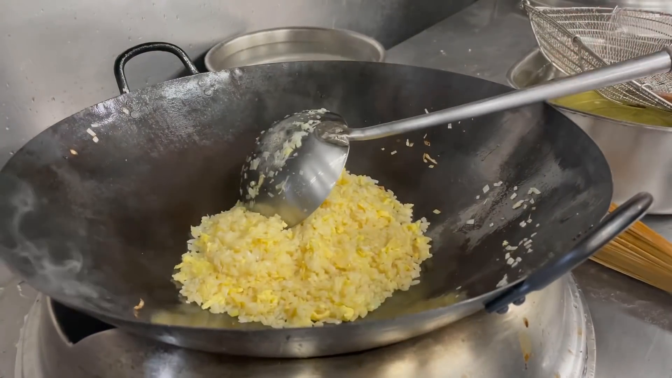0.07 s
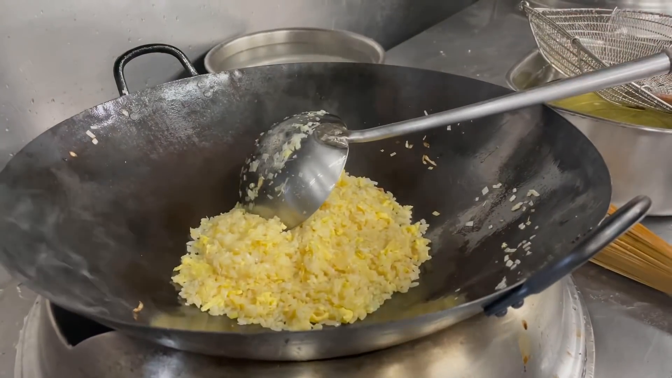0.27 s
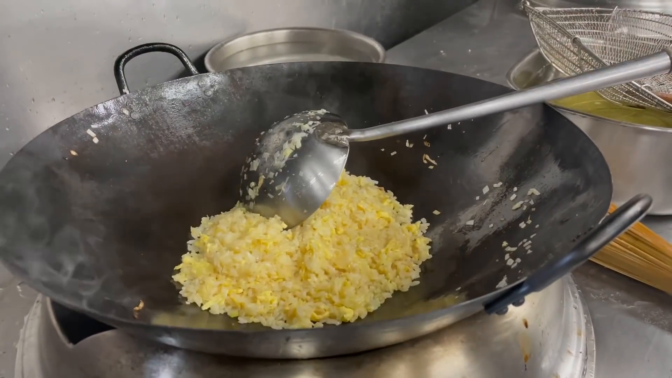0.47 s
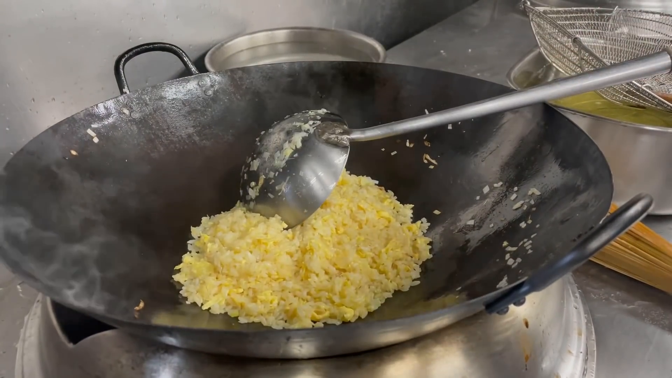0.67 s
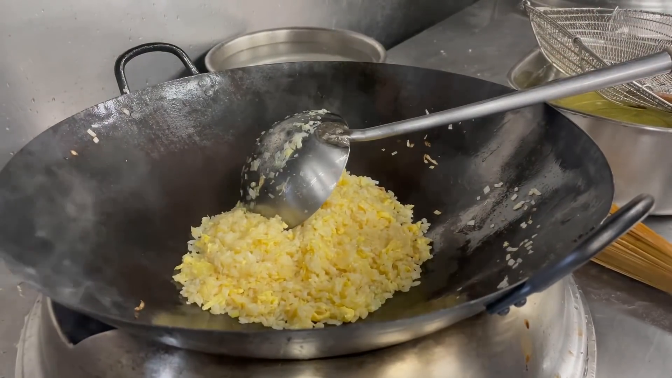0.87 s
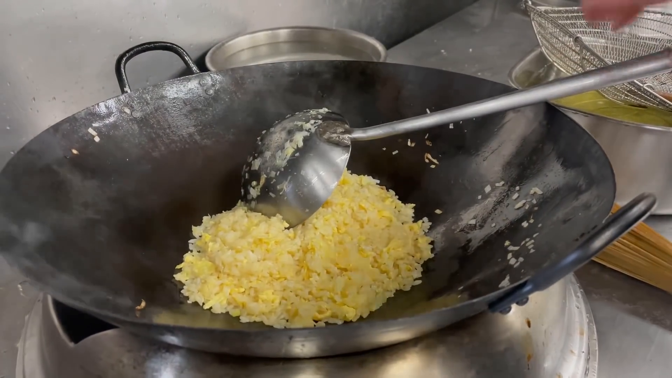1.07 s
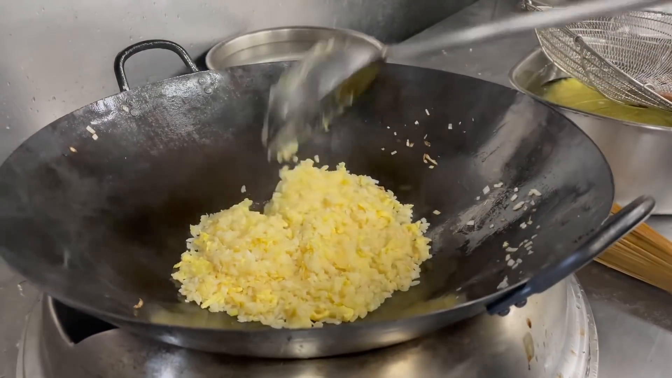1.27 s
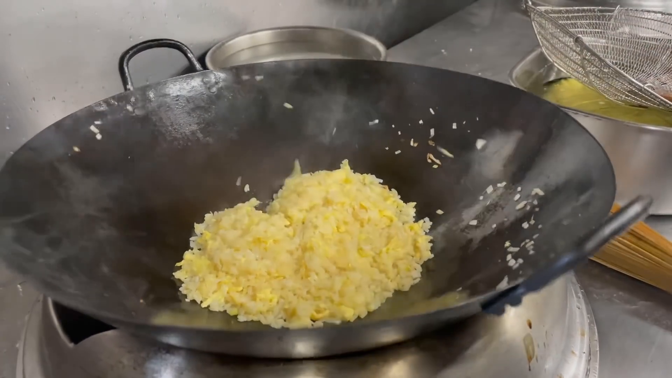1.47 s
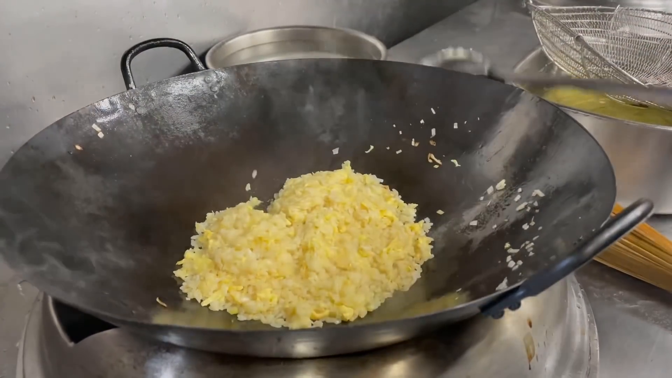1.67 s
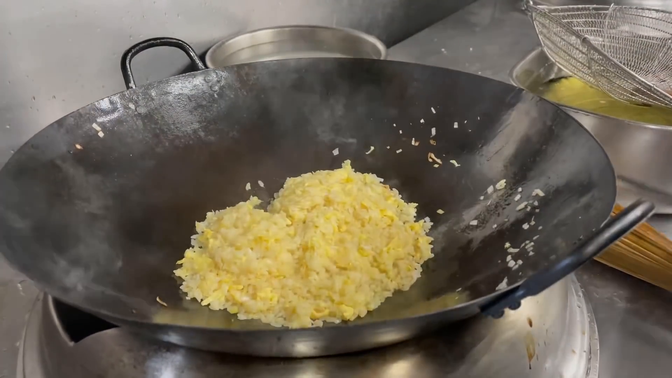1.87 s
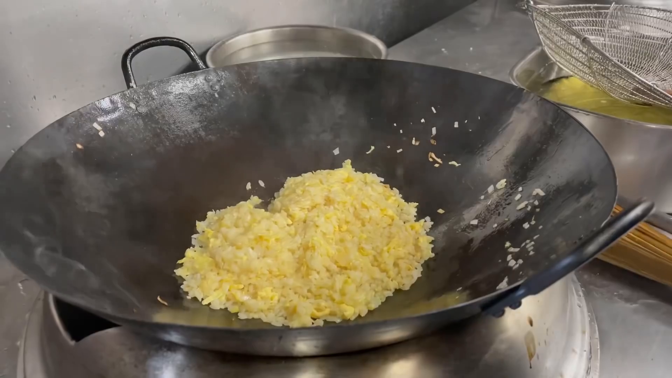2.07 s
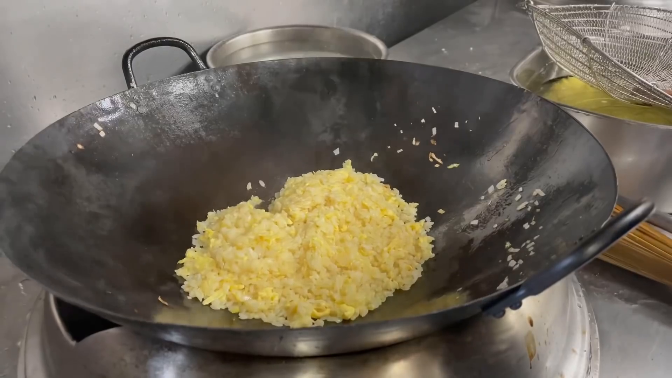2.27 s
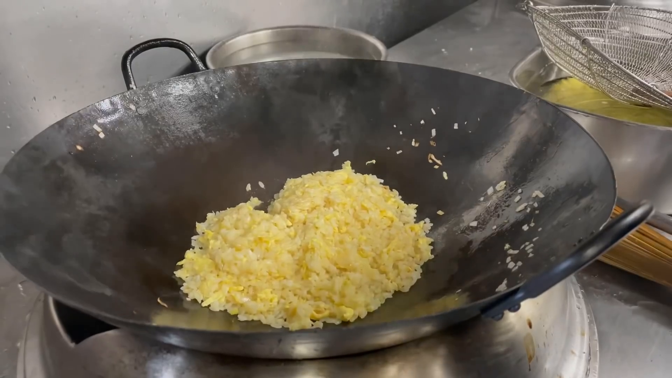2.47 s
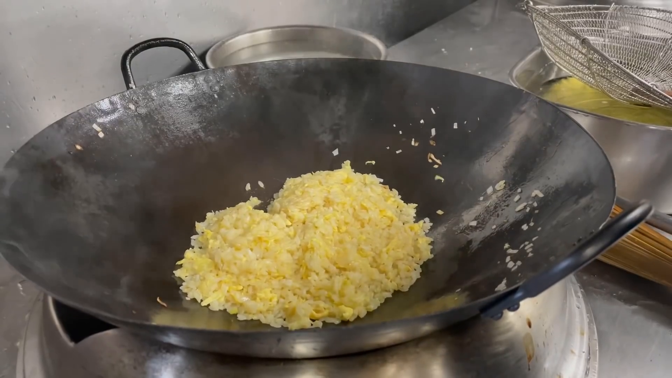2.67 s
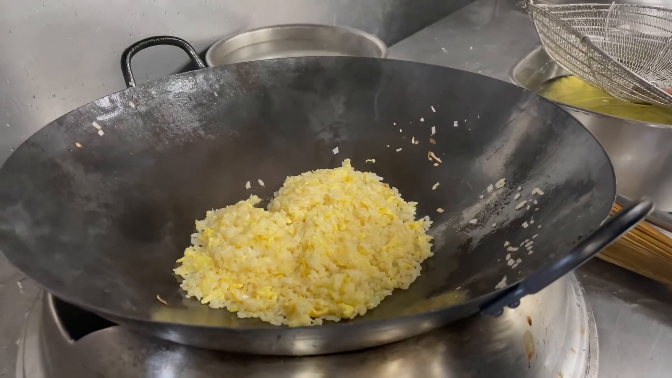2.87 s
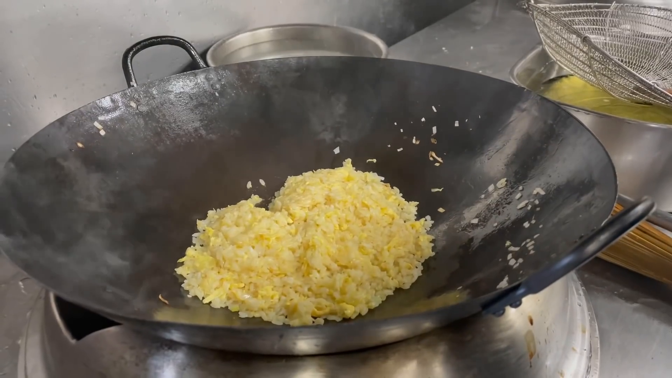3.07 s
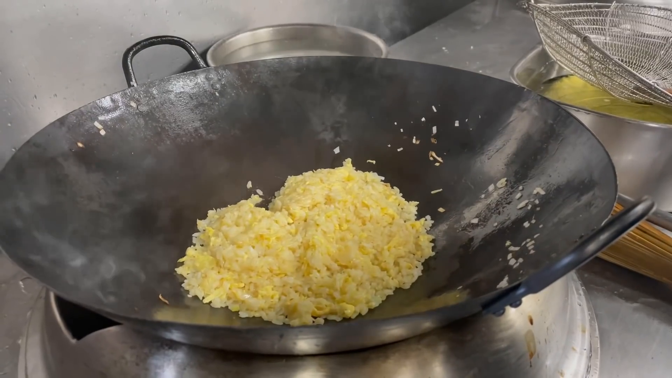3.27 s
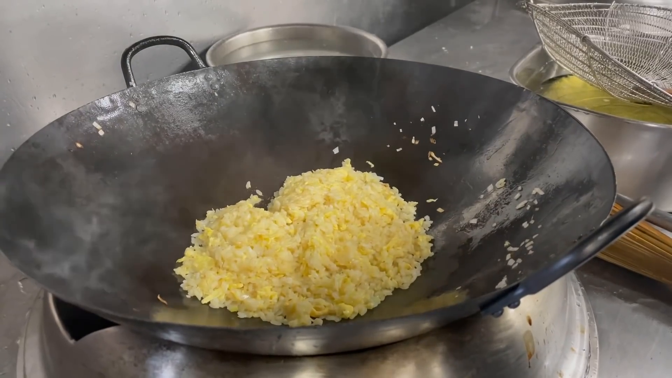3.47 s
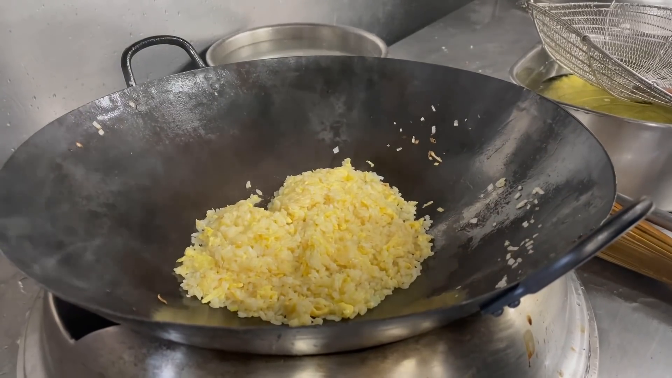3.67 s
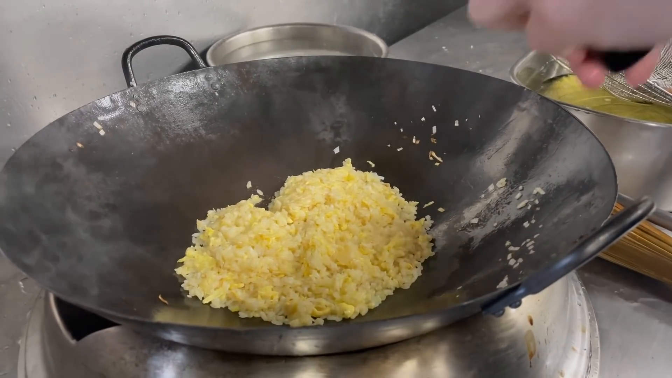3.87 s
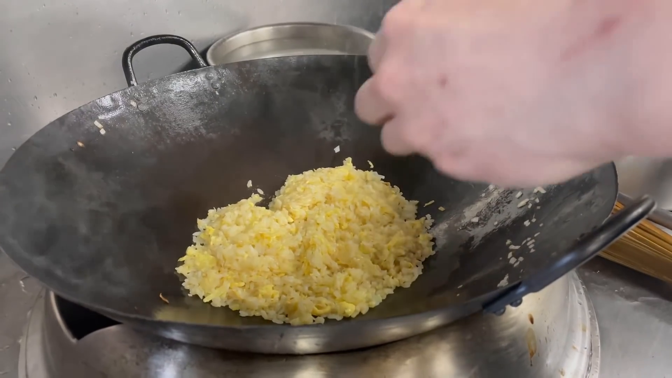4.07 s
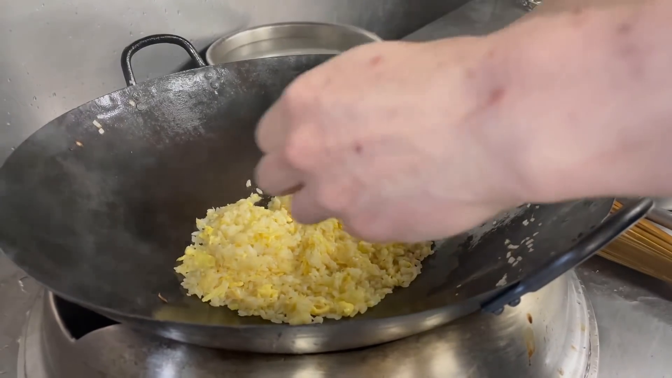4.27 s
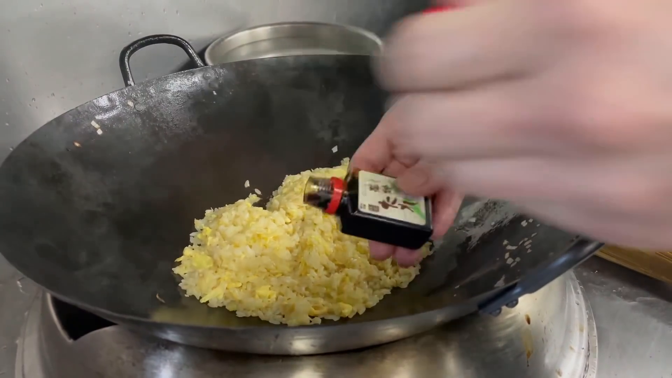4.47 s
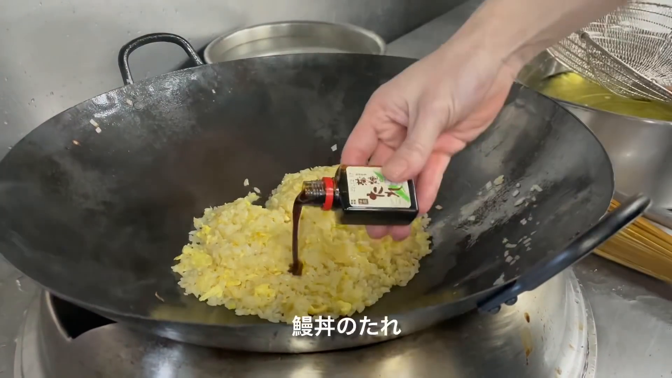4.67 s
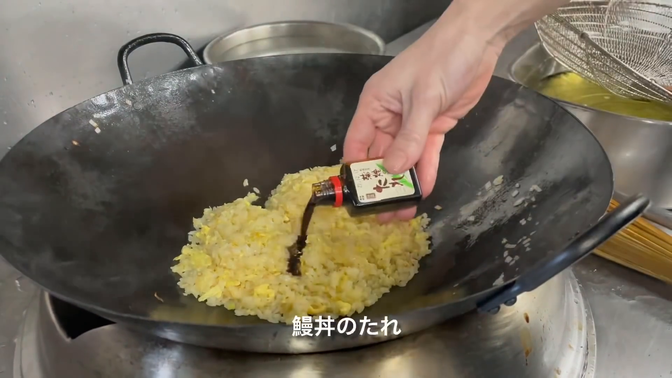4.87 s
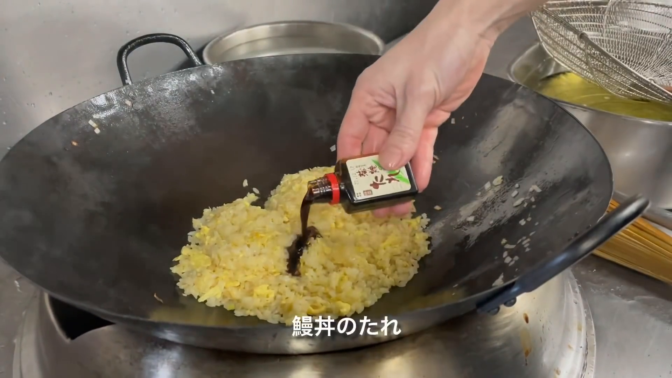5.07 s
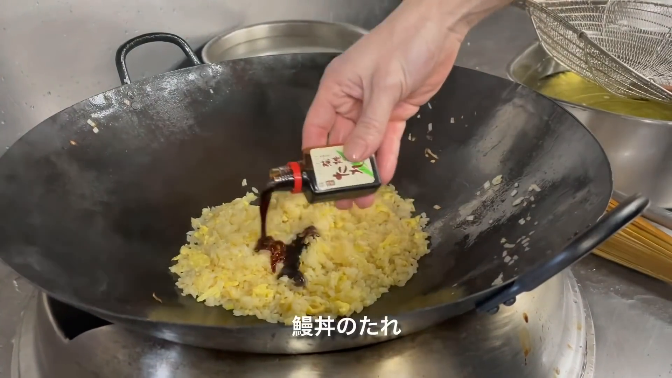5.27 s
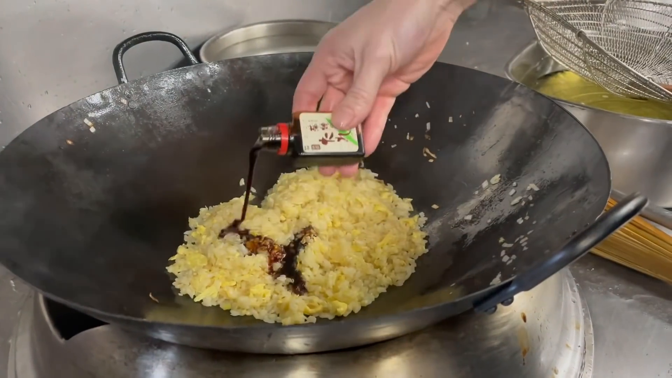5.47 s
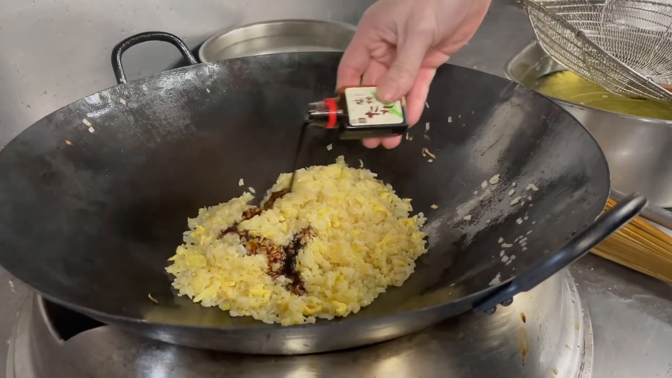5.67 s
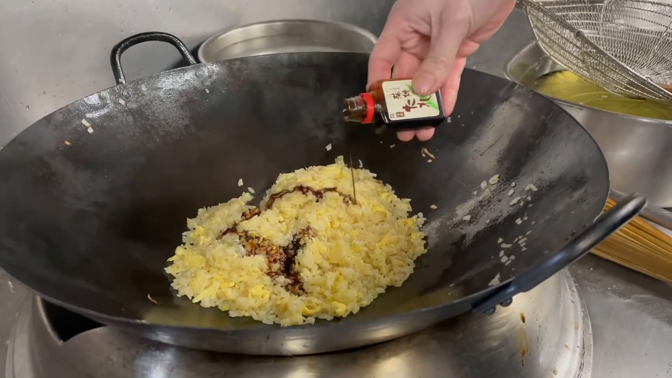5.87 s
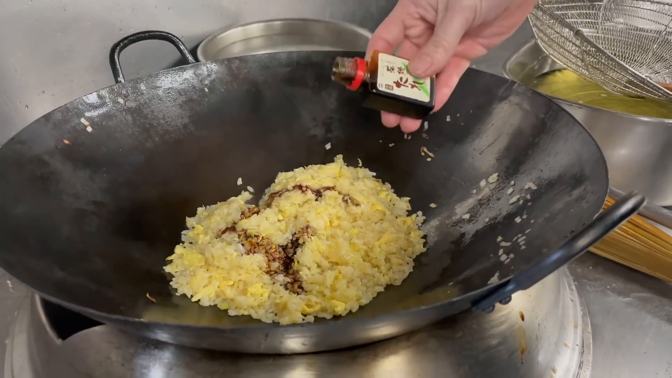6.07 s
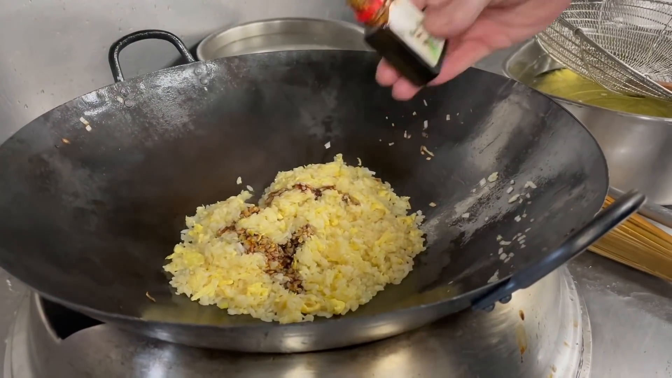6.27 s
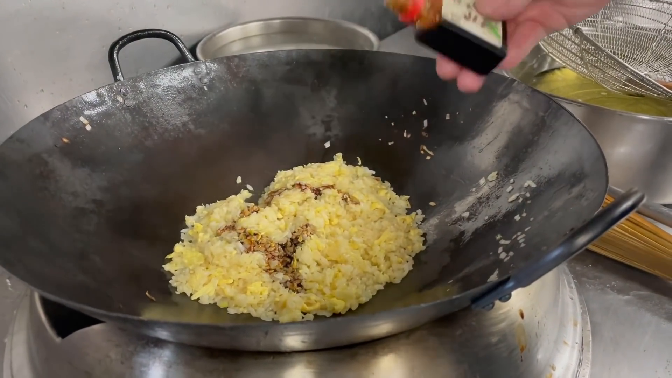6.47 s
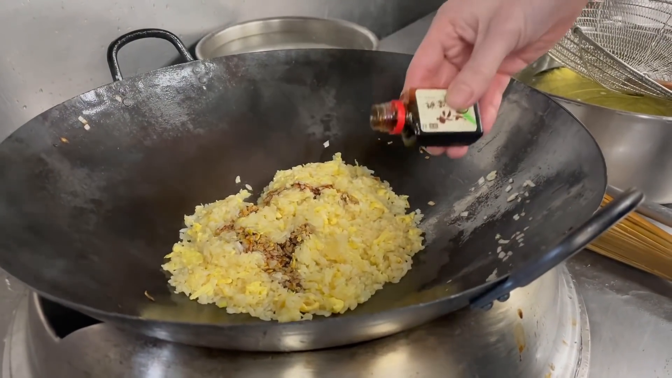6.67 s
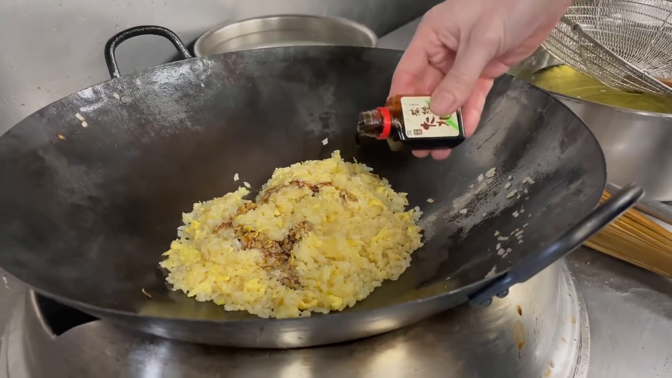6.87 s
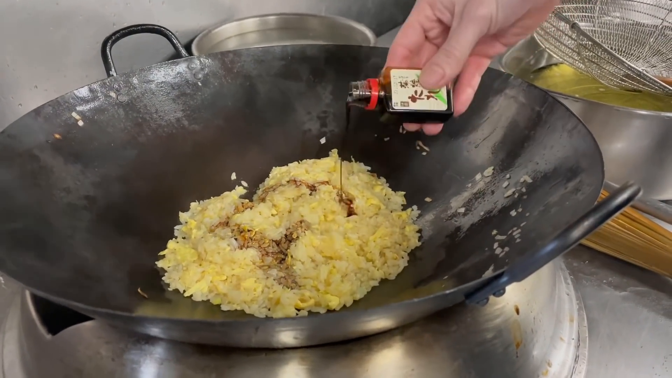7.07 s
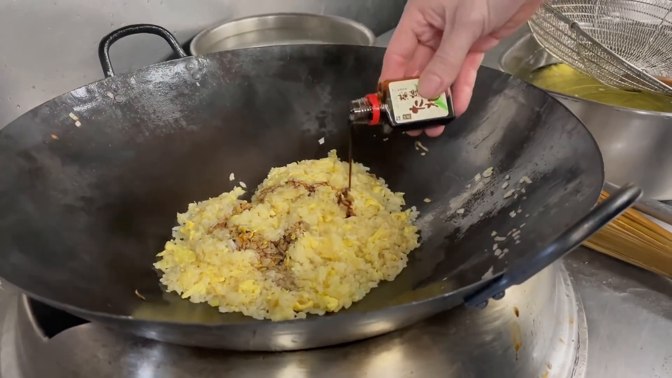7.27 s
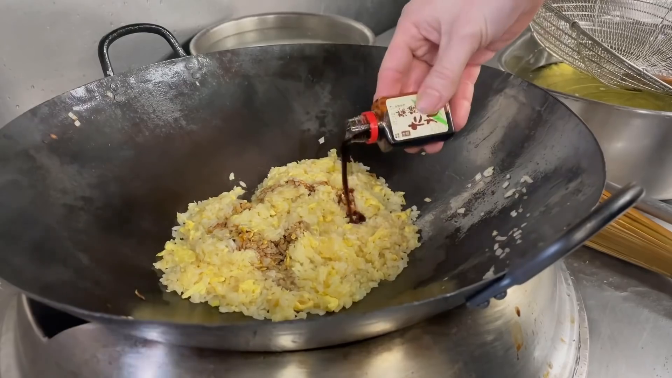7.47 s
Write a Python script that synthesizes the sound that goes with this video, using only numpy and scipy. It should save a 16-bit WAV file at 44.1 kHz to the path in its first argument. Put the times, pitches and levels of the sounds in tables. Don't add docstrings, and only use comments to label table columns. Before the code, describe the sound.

Rice crackles over a roaring burner; a ladle rings the wok and clatters onto steel, then poured sauce swells into bright, spitting sizzle.

```python
import sys
import numpy as np
from scipy import signal
from scipy.fft import rfft, irfft, next_fast_len
from scipy.io import wavfile
from scipy.ndimage import uniform_filter1d

SR = 44100
rng = np.random.default_rng(int(sys.argv[2]) if len(sys.argv) > 2 else 0)


def generate_wav(sig):
    pcm = np.round(np.clip(np.atleast_2d(sig).T, -1, 1) * 32767).astype(np.int16)
    wavfile.write(sys.argv[1], SR, pcm)


def how_loud(loudness_db):
    steps = np.asarray(loudness_db, float) / 20
    return 10 ** steps


N = 331615

# pitch_hz, level_db (per Hz)
ROAR_COLOUR = [(22, -32), (40, -9), (62, 4), (95, -11.5), (120, 9), (155, -10.5), (215, -4), (300, -10.5),
               (400, -14), (700, -12), (1200, -16.5), (2000, -24), (4000, -42)]
# pitch_hz, level_db (per Hz)
WASH_COLOUR = [(300, 4), (700, -6), (1500, 0), (2100, -3), (2700, 0.5), (3500, -1), (4600, -4.5),
               (7000, -3), (12000, -12)]
# pitch_hz, level_db (per Hz)
SIZZLE_COLOUR = [(1500, -20), (3000, -8), (5000, -10), (7000, 2), (9500, -2.5), (12000, -3.5), (15500, -3),
                 (16200, -23)]
# pitch_hz, level_db (per Hz)
SEETHE_COLOUR = [(1500, -22), (2300, 2), (2500, -10), (2650, 9.5), (2850, -10), (3250, 3), (3700, -1.5),
                 (5000, -6), (7000, -7), (10000, -6), (16000, -28)]
# time_s, vigour_db
VIGOUR = [(0, 0.5), (.6, 0.5), (1.15, 3), (2.35, -2), (3.2, -3.5), (3.9, -3.5), (4.9, -5), (5.43, -2),
          (5.8, -4.5), (6.1, -0.5), (6.6, 4.5), (7.0, 5.5), (7.52, 5)]
# start_s, end_s, start_hz, end_hz, level_db
SQUEAKS = [
    (7.355, 7.44, 9680, 9780, -47),
    (7.41, 7.475, 4300, 4280, -48),
    (7.43, 7.53, 10900, 10950, -49),
]
# start_s, peak_db, colour_hz
LOUD_POPS = [(0.1264, -24.5, 10600), (0.3202, -32, 10700), (0.5008, -32, 10500), (0.6635, -29, 3930),
             (0.7791, -30, 4160), (1.1729, -27.5, 3050), (1.2123, -24, 3150), (1.2464, -28.5, 4270),
             (2.0333, -33, 3950), (2.0642, -20, 5370), (2.153, -26, 3350), (2.2573, -30, 3420),
             (2.428, -30, 4290), (2.6305, -29, 3980), (2.768, -28, 10300), (2.7862, -19.5, 3920),
             (2.8064, -34, 10800), (3.1295, -29, 5800), (3.2324, -28, 9800), (3.3077, -26, 9640),
             (3.424, -41, 3210), (3.4524, -29, 5330), (3.5389, -31.5, 3700), (3.6264, -29, 5740),
             (3.661, -31, 10900), (3.906, -32, 9750), (3.9916, -30, 4520), (4.1185, -29, 5450),
             (4.2095, -29.5, 10200), (4.3642, -22.5, 11800),
             (4.346, -27, 3980), (4.6374, -24, 3230), (4.6748, -29.5, 3130), (4.7314, -28, 3230),
              (4.784, -34, 10100), (4.8545, -32, 11400), (5.0285, -29, 9600), (5.1924, -30, 11000),
              (5.2827, -23, 3000), (5.372, -28, 5510), (5.389, -26, 5320), (5.4085, -24, 4470),
              (5.4485, -31, 3220), (5.4964, -31, 3330), (5.5655, -29, 5900), (5.6337, -24, 3520),
              (5.7665, -21.5, 10400), (5.8202, -25, 5050), (5.8531, -35, 3680), (6.045, -23.5, 4700),
              (6.0672, -22, 10800), (6.113, -20, 11400), (6.2048, -26, 3220), (6.234, -22, 6000),
              (6.3267, -32.5, 3350), (6.4144, -37, 3150), (6.6235, -25, 3690), (7.1048, -24, 3610),
              (7.2903, -24.5, 4700), (7.3265, -26, 8990)]
# start_s, level_db, hardness_hz, t60_s
COUNTER_BLOWS = [(1.690, -0.5, 2500, 0.13), (1.7045, -5, 3020, 0.083), (1.718, -14, 3000, 0.29),
                 (1.8588, -6.5, 2090, 0.24), (1.871, -4.5, 2920, 0.48), (1.878, -22, 4960, 0.18),
                 (1.901, -20.5, 170, 0.47), (1.917, -23.5, 1190, 0.39), (1.9882, -22.5, 5560, 0.097),
                 (2.038, -23, 3020, 0.086), (2.15, -41, 5900, .06), (2.21, -38, 8000, 0.05),
                 (2.268, -38, 4000, .06), (2.842, -30, 1600, 0.23), (2.862, -31.5, 700, 0.25),
                 (4.301, -30.5, 590, 0.41), (4.87, -32, 600, 0.34), (7.185, -26, 600, 0.25),
                 (7.2, -44, 900, 0.18)]
# pitch_hz, level_db, t60_s
LADLE_MODES = [(640, -3, .07), (735, 0, .05), (865, 3, .04), (912, -2, .08), (1062, -2, .12),
               (1250, -9, .08), (2160, -16, .06)]
# pitch_hz, level_db, t60_s
COUNTER_CROWD = [(80, -10, 0.26), (300, -9, 0.74), (700, -1, 0.66), (1500, -16, 0.3), (2400, -3.5, 0.25),
                 (4380, -0.5, 0.13), (8200, 9, 0.13), (16000, 14, 0.11)]
# start_s, level_db, hardness_hz, added_t60_s
WOK_BLOWS = [(0.749, -31, 300, 0.72), (0.78, -17, 200, 0.27), (0.986, -55, 1200, .06),
             (1.069, -24.5, 520, 1), (1.104, -23, 1860, 0.18), (1.172, -28.5, 3000, .05),
             (1.212, -32, 4000, .05), (1.236, -36, 3000, .05), (1.3105, -1, 6070, 0.44),
             (1.387, -11.5, 910, 0.78), (1.3925, -7, 4560, 0.56), (1.405, -14.5, 2500, 0.48),
             (1.441, -9.5, 700, 0.94), (1.47, -15, 5000, 0.68), (1.494, -15.5, 700, 1)]
# touch_s, full_pressure_s, lift_s, pressure_db
DRAGS = [
    (0.752, .8, 0.78, -36),
    (1.049, 1.12, 1.146, -38.5),
    (1.328, 1.416, 1.57, -30),
]
# pitch_hz, level_db, t60_s
WOK_MODES = [(118, -4, .4), (220, 2, .8), (287, -7, .4), (324, -2, .4), (415, -3, .5), (482, -2, .4),
             (640, 1, .4), (711, -3, .5), (800, 1, .5), (863, 1, .5), (1064, -8, .6), (1389, -7, .9),
             (1523, -13, .9), (1771, -3, .8), (2143, -7, .5), (2165, 1, .7), (2482, -5, .8), (2692, -3, .6),
             (2950, -5, .6), (3110, -7, .6), (3192, -3, .7), (3262, -1, 1.1), (3354, -1, .9), (3570, 0, .5),
             (3703, -1, .5), (3780, -3, .5), (3865, -6, .6), (3940, -5, .6), (4307, -10, .5),
             (4753, -11, .6)]
# pitch_hz, level_db, t60_s
WOK_CROWD = [(50, 5, 0.17), (150, -2.5, 0.2), (300, 6, 0.8), (520, 13, 0.35), (900, 11, 0.19),
             (1420, -5.5, 0.24), (2300, 0.5, 0.33), (3150, 8.5, 0.74), (5000, 2.5, 0.69), (8000, 2.5, 0.43),
             (12000, 12, .28), (16000, 12, .22)]
# pitch_hz, t60_s
KITCHEN_T60 = [(100, 0.58), (1000, 0.4), (4000, 0.47), (12000, 0.17)]
# pitch_hz, likeness (0-1), left_lead_rad
PORTS = [(60, .995, 0), (200, .95, .1), (400, .65, .4), (900, .55, 1.1), (1500, .4, .9), (1900, .1, 0),
         (2700, .6, .1), (3400, .45, .7), (4500, .7, .2), (5700, .3, -1.2), (6900, .85, -2.8),
         (8100, .9, -3.5), (9700, .88, -5.5), (11600, .9, -6.7), (14000, .9, -9.0), (16000, .9, -10.1)]


def evened(x):
    return x / np.sqrt(np.mean(x ** 2) + 1e-20)


def read(table, hz):
    f, *columns = np.transpose(table)
    return [np.interp(np.log(hz + 1), np.log(f + 1), c, c[0], c[-1]) for c in columns]


def follow(table, t):
    s, *columns = np.transpose(table)
    return [np.interp(t, s, c) for c in columns]


def add(mix, s, sound):
    part = mix[round(s * SR):][:len(sound)]
    part += sound[:len(part)]


def tails(table_hz, db, t60, count):
    hz, t, z = signal.stft(rng.standard_normal((count, SR // 2)), SR, nperseg=256)
    db, t60 = read(np.transpose([table_hz, db, t60]), hz)
    return z * how_loud(db[:, None] - 60 * t / t60[:, None]), hz


def kitchen(x):
    hz, t60 = np.transpose(KITCHEN_T60)
    z, _ = tails(hz, 0 * hz, t60, count=2)
    tail = signal.istft(z, SR, nperseg=256)[1]
    build_up_s = 0.016
    tail = tail * np.clip(np.arange(tail.shape[1]) / SR / build_up_s, 0, 1)
    return signal.fftconvolve(x[None], tail / np.linalg.norm(tail[0]), axes=1)[:, :N]


def air(colour, level_db, size, patchy_db, flicker_db):
    frames, hz = 4 * N // size + 5, np.fft.rfftfreq(size, 1 / SR)
    a, b, c, d, patches = rng.standard_normal((frames, len(hz), 5)).T
    patches = evened(uniform_filter1d(uniform_filter1d(patches, 8, 0), 10, 1))
    flicker = evened(uniform_filter1d(rng.standard_normal(frames), 4))
    inside = (hz > colour[0][0]) & (hz < colour[-1][0])
    shape_db = read(colour, hz)[0][:, None] + patchy_db * patches + flicker_db * flicker
    bins = np.array([a + 1j * b, c + 1j * d]) * how_loud(shape_db) * inside[:, None]
    noise = signal.istft(bins, nperseg=size, noverlap=3 * size // 4)[1]
    return evened(noise[:, :N]) * how_loud(level_db)


def burner(t, vigour_db):
    level_db = -44 + 0.7427 * t + 0.14 * vigour_db
    return air(ROAR_COLOUR, level_db, size=2048, patchy_db=1.5, flicker_db=.3)


def hiss(t, vigour_db):
    wash = air(WASH_COLOUR, -48.5 + 1.01 * vigour_db, size=512, patchy_db=2.9, flicker_db=1.3)
    sizzle = air(SIZZLE_COLOUR, -52.5 + 0.78 * vigour_db, size=256, patchy_db=1.3, flicker_db=5.5)
    full_s, knee_s, rise_db_per_s = 6.24, 0.16, 28
    seethe_db = -47 - rise_db_per_s * knee_s * np.logaddexp(0, (full_s - t) / knee_s)
    return wash + sizzle + air(SEETHE_COLOUR, seethe_db, size=512, patchy_db=3.5, flicker_db=0.5)


def squeaks():
    t = np.arange(N) / SR
    waver = evened(uniform_filter1d(rng.standard_normal(N), 3000))
    peak_s, fade_db_per_s = 4.1, 4
    whistle_db = -54 - fade_db_per_s * abs(t - peak_s) + 2 * waver
    whistle_hz = 2150 + 4 * waver
    out = how_loud(whistle_db) * np.sin(2 * np.pi * np.cumsum(whistle_hz) / SR)
    for s, end, hz, end_hz, db in SQUEAKS:
        glide = np.linspace(hz, end_hz, round((end - s) * SR))
        tone = np.sin(2 * np.pi * np.cumsum(glide) / SR)
        add(out, s, how_loud(db) * signal.windows.tukey(len(glide), .5) * tone)
    return out


def pop_shapes(hz):
    t, fade_ms = np.arange(64) / SR, .09
    snap = rng.standard_normal((len(hz), 64))
    burst = (1.42 * snap + np.sin(2 * np.pi * hz[:, None] * t)) * t * np.exp(-t * 1000 / fade_ms)
    burst = signal.lfilter(*signal.butter(1, [3000, 15000], "band", fs=SR), burst)
    return burst / abs(burst).max(axis=1, keepdims=True)


def pops():
    out = np.zeros(N)
    small_count, small_db, spread_db = 80, -36, 2.5
    when, strength, colour = rng.random((small_count, 3)).T
    small_s = when ** 1.2 * N / SR
    small = np.transpose([small_s, small_db + spread_db * (2 * strength - 1), 3000 * 4 ** colour])
    loud = np.array(LOUD_POPS)
    drops = np.repeat(loud, 6, axis=0)
    scatter = rng.uniform(-1, 1, drops.shape) * [.03, spread_db, 500]
    drops = drops + scatter + [0, -16, 0]
    s, db, hz = np.vstack([loud, drops, small]).T
    lift_db = 4.5
    for at, sound in zip(s, how_loud(db + lift_db)[:, None] * pop_shapes(hz)):
        add(out, at, sound)
    return out


def crackle():
    crackles_per_s, kinds = 260, 24
    strength = how_loud(4.5 * np.minimum(rng.exponential(1, N), 3))
    size = strength * (rng.random(N) < crackles_per_s / SR)
    kind = rng.integers(0, kinds, N)
    shapes = pop_shapes(np.geomspace(2500, 13000, kinds))
    bed = sum(signal.oaconvolve(size * (kind == k), shape)[:N] for k, shape in enumerate(shapes))
    return evened(bed) * how_loud(-61.5 + 0.78 * follow(VIGOUR, np.arange(N) / SR)[0])


def frying():
    out = pops() + crackle()
    t = np.arange(2000) / SR
    after = rng.standard_normal(2000) * how_loud(-31.0 - 60 * t / 0.072)
    return out + signal.oaconvolve(out, after)[:N]


def strikes(modes, crowd, blows, spot_db, crowd_db, stagger):
    hz, db, t60 = np.transpose(modes)[:, :, None]
    level_db, hardness_hz, held_t60 = np.transpose(blows)[1:, :, None]
    t = np.arange(SR // 2) / SR
    rings = how_loud(db - 60 * t / t60) * np.sin(2 * np.pi * hz * t + stagger * hz)
    spot = rng.standard_normal((len(blows), len(modes)))
    clear = (how_loud(spot_db * spot) / (1 + (hz.T / hardness_hz) ** 3)) @ rings
    z, bins = tails(*np.transpose(crowd), count=len(blows))
    softened = z / (1 + (bins / hardness_hz) ** 3)[:, :, None]
    dense = signal.istft(softened, SR, nperseg=256)[1][:, :len(t)]
    onset = 1 - np.exp(-t / 0.00049)
    sounds = (clear + how_loud(crowd_db) * dense) * onset * how_loud(-60 * t / held_t60)
    return sounds / abs(sounds).max(axis=1, keepdims=True) * how_loud(level_db)


def counter():
    out = np.zeros(N)
    sounds = strikes(LADLE_MODES, COUNTER_CROWD, COUNTER_BLOWS, spot_db=5, crowd_db=13.5, stagger=0)
    for blow, sound in zip(COUNTER_BLOWS, sounds):
        add(out, blow[0], sound)
    return out


def drag_pressure(t):
    pressure = np.zeros(N)
    for s, full, end, db in DRAGS:
        eased_db = -3.5 * (end > full)
        press_db = np.interp(t, [s, full, end], [-7, 0, eased_db])
        lift_db = 300 * np.maximum(t - end, 0)
        pressure += how_loud(db + press_db - lift_db) * (t > s)
    return pressure


def wok():
    grit_blow = (0, 0, 1300, .15)
    *sounds, grit_ring = strikes(WOK_MODES, WOK_CROWD, WOK_BLOWS + [grit_blow],
                                 spot_db=2, crowd_db=11.5, stagger=1)
    out, t = np.zeros(N), np.arange(N) / SR
    for blow, sound in zip(WOK_BLOWS, sounds):
        add(out, blow[0], sound)
    grit = (rng.random(N) < 500 / SR) * rng.standard_normal(N)
    out += signal.oaconvolve(drag_pressure(t) * grit, grit_ring)[:N]
    swell_db = np.interp(t, (1.5, 1.556), [0, 6])
    grip_s, grip_lasts_s = 1.59, 0.2
    grip_db = -16 * np.clip((t - grip_s) / grip_lasts_s, 0, 1)
    return out * how_loud(swell_db + grip_db)


def scene():
    near = wok() + counter() + frying() + squeaks()
    scatter = rng.standard_normal(800) * np.exp(-np.arange(800) / 160)
    turns = rfft(scatter, 2048)
    scatter = irfft(turns / abs(turns), 2048)[:900]
    paths = np.array([near, how_loud(-2.5) * signal.oaconvolve(near, scatter)[:N]])
    t = np.arange(N) / SR
    vigour_db = follow(VIGOUR, t)[0]
    noises = burner(t, vigour_db) + hiss(t, vigour_db)
    return paths + how_loud(-11.5) * kitchen(near) + noises


def top_cut(x):
    return signal.sosfilt(signal.butter(12, 17490, fs=SR, output="sos"), x)


def record(dry):
    size = next_fast_len(N + 4096)
    hz = np.fft.rfftfreq(size, 1 / SR)
    shared, scattered = rfft(dry, size)
    likeness, lead = read(PORTS, hz)
    right = likeness * shared + np.sqrt(1 - likeness ** 2) * scattered
    right = right * np.exp(-1j * lead) * how_loud(-0.95)
    top_hz, low_cut_hz = 16300, 42
    edge = 1 / (1 + (hz / top_hz) ** 40) / (1 + (low_cut_hz / (hz + 1)) ** 3)
    mix = irfft(np.array([shared, right]) * edge, size)[:, :N]
    return top_cut(mix)


dry = scene()
out = record(dry)
generate_wav(out)
```